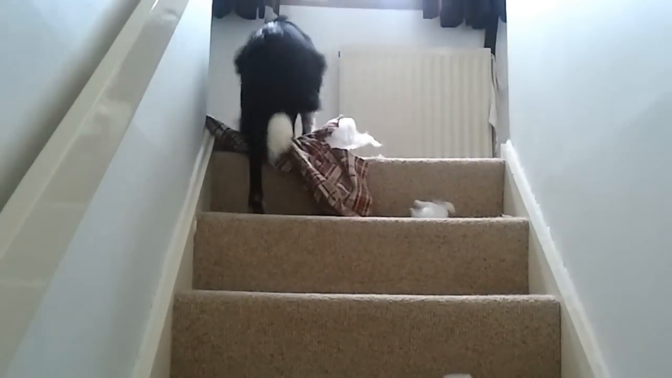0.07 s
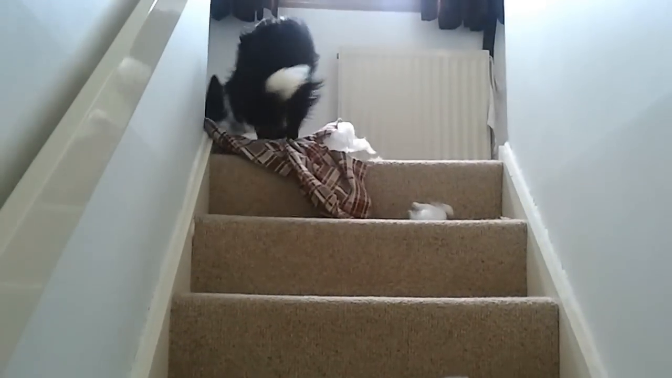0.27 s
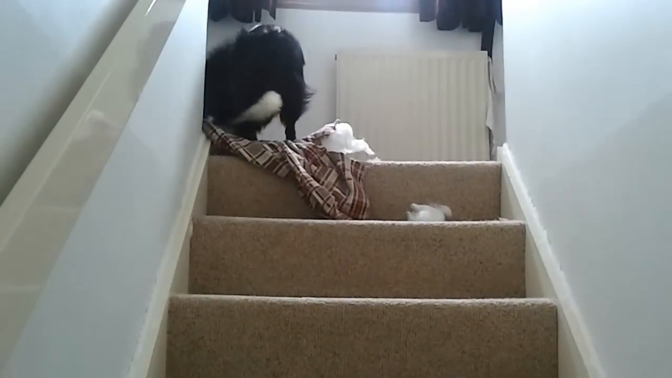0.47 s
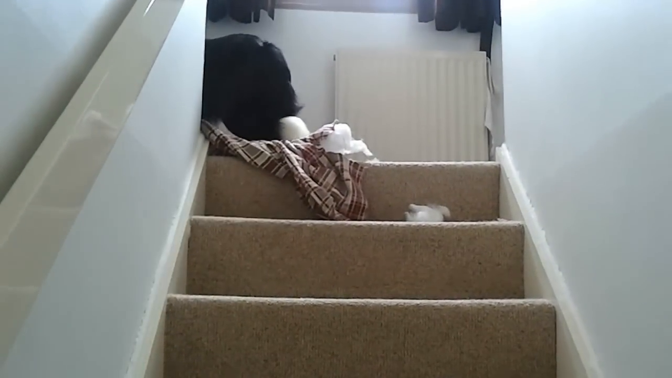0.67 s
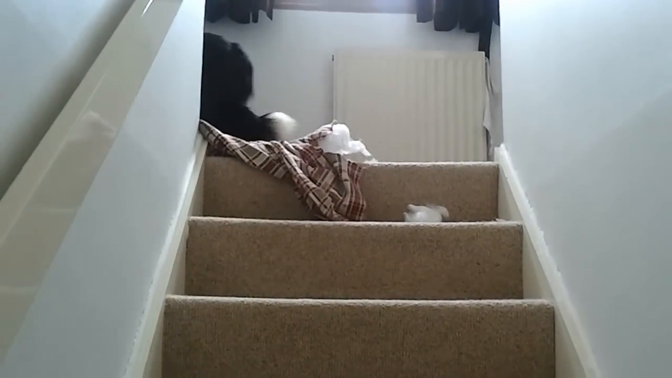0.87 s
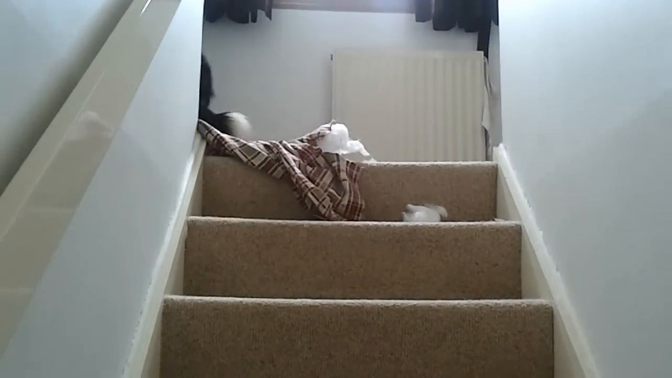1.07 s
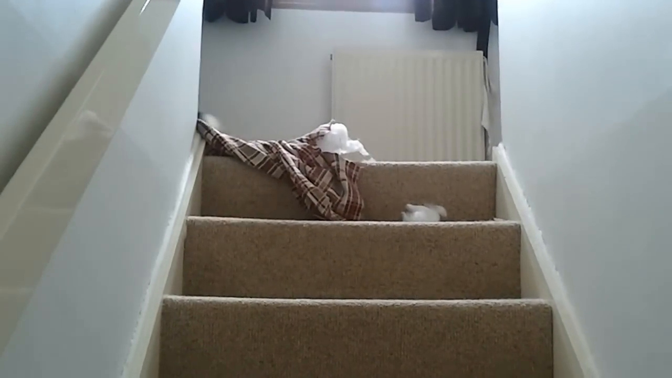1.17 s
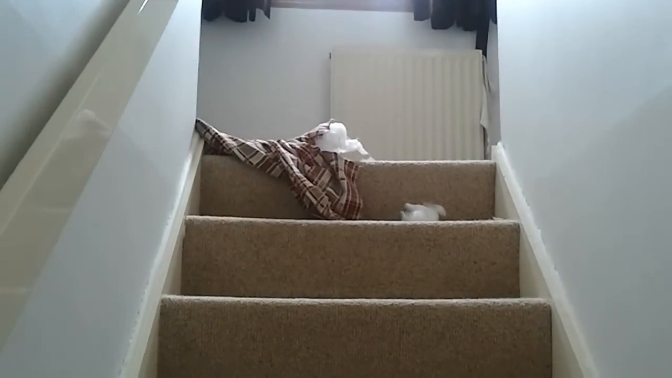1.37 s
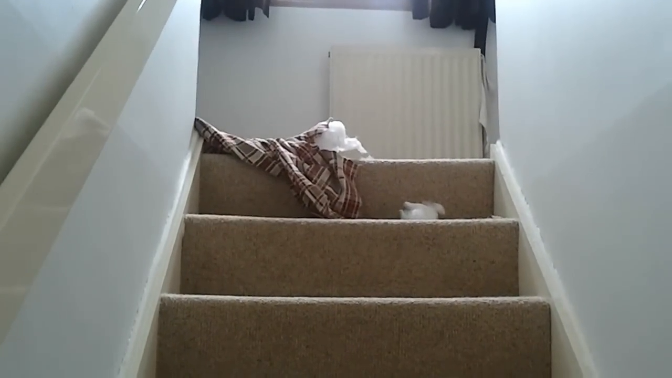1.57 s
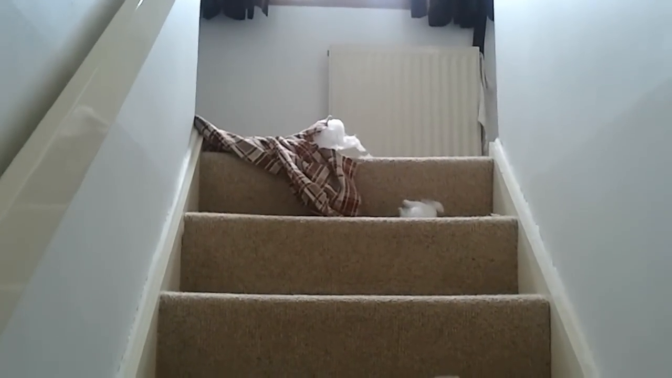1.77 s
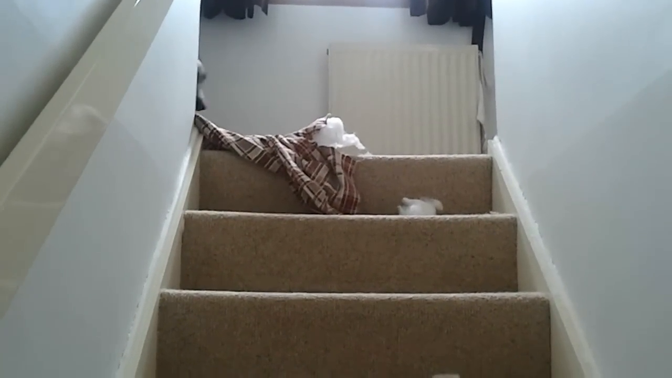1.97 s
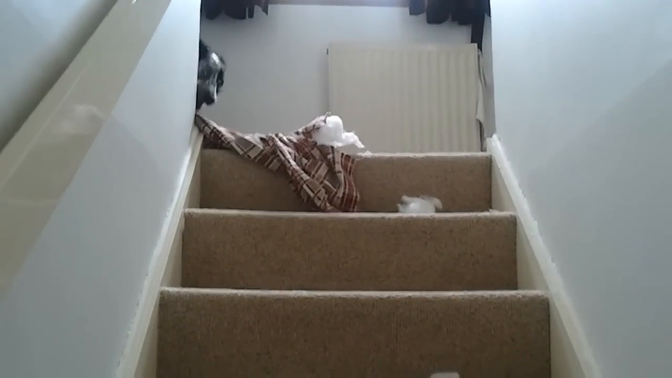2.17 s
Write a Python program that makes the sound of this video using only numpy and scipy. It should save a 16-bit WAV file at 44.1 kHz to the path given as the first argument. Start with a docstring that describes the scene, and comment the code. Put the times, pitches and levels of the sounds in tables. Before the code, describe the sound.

A dog's footsteps on carpeted wooden stairs: a lighter knock at 0.07 s, the loudest at 0.22 with a bright claw scrape, another at 0.32 with a quick after-tap. Soft paw pats run from 0.6 to 1.0 s, with a faint rustle and low board boom near 0.74. Dull, reverberant thumps round the corner fall at 1.12, 1.64 and 2.17, weakening, with faint pats near 1.78 and 2.02, over quiet room hiss.

```python
"""In a quiet house, a dog climbs the top of a carpeted wooden staircase.
Room hiss is shaped noise with a faint narrow whirr; rustles and claw scrapes are swells of filtered noise.
Close knocks sum decaying noise bands, the tread's modes, a two-pitched clack and a slow push.
Soft paw pats (noise bands, a clack, one floorboard boom) follow, and evenly spaced dull thumps
from round the corner, which excite the landing's modes and share one reverberant path."""
import sys
import numpy as np
from scipy import signal
from scipy.fft import rfft, irfft
from scipy.io import wavfile

SR = 44100
rng = np.random.default_rng(int(sys.argv[2]) if len(sys.argv) > 2 else 0)


def generate_wav(sig):
    """Save sig (samples, or channels by samples) to the path in sys.argv[1] as 16-bit PCM at SR."""
    pcm = np.round(np.clip(np.atleast_2d(sig).T, -1, 1) * 32767).astype(np.int16)
    wavfile.write(sys.argv[1], SR, pcm)


N = 97020  # samples, 2.2 s
EDGE_HZ = 7900  # upper band limit of the sound
BAND_CENTRES_HZ = np.geomspace(28, 9000, 26)
BASS_HZ, TREBLE_HZ = 266, 1760  # corners of a blow's weight and hardness
LOW_CUT_HZ = 76  # below this the knocks and pats fall away
CLACK_RISE_S = 0.0026


def amp(db):
    """Level law: a gain is ten to the power of dB / 20."""
    return 10 ** (np.asarray(db) / 20)


def unit(x):
    """Power normalization: scales a signal to an rms of one."""
    return x / np.sqrt(np.mean(x ** 2) + 1e-20)


def read(points, hz):
    """Logarithmic frequency scale: interpolates a table between its points."""
    f, value = np.transpose(points)
    return np.interp(np.log(hz + 1), np.log(f + 1), value)


def add(mix, s, sound):
    """Superposition: adds a sound to the mix from a time in seconds."""
    part = mix[max(round(s * SR), 0):][:len(sound)]
    part += sound[:len(part)]


def noise(n, colour):
    """Spectral shaping: white noise weighted by colour(hz), at an rms of one."""
    hz = np.fft.rfftfreq(n, 1 / SR) + 1
    spectrum = rfft(rng.standard_normal(n)) * colour(hz)
    return unit(irfft(spectrum, n))


def octave_noise(n, centre_hz, width_octaves):
    """Band-pass filtering: noise with a Gaussian spectrum on the octave scale."""
    return noise(n, lambda f: np.exp(-(np.log2(f / centre_hz) / width_octaves) ** 2))


def tilt(hz, bass_db, treble_db):
    """Impact spectrum: a heavy blow has more bass, a hard one more treble (dB)."""
    bass = bass_db / (1 + (hz / BASS_HZ) ** 4)
    treble = treble_db / (1 + (TREBLE_HZ / hz) ** 2)
    return bass + treble


def response(t60, rise_s, direct_db, direct_s, hold_s=0):
    """Reverberant decay: each band has a direct burst, an exponential tail and an energy of one."""
    t = np.arange(SR // 2) / SR
    step = np.log(BAND_CENTRES_HZ[1] / BAND_CENTRES_HZ[0])
    direct = amp(direct_db) * np.exp(-(t / direct_s) ** 2)
    rows = []
    for hz, decay_s in zip(BAND_CENTRES_HZ, t60 * np.ones(len(BAND_CENTRES_HZ))):
        band = noise(len(t), lambda f: np.sqrt(np.maximum(1 - abs(np.log(f / hz)) / step, 0)))
        # even out the noise's own swells
        band = band / np.sqrt(abs(signal.hilbert(band)) + .1)
        # low bands build up more slowly
        rise = 1 - np.exp(-(t / (rise_s + .5 / hz / np.pi)) ** 2)
        # a hold delays the onset of the decay
        tail = np.exp(-np.log(1000) * (np.hypot(t, hold_s) - hold_s) / decay_s)
        row = band * rise * (tail + direct)
        rows.append(row / np.linalg.norm(row))
    return np.array(rows)


def ring(modes, rise_s, bass_db, treble_db, phases=0):
    """Modal synthesis: damped cosines, coloured by the blow; phases are in cycles."""
    t = np.arange(SR // 2) / SR
    tones = np.zeros(len(t))
    for (hz, db, t60), phase in zip(modes, phases + np.zeros(len(modes))):
        gain = amp(db + tilt(hz, bass_db, treble_db))
        decay = np.exp(-np.log(1000) * t / t60)
        tones += gain * decay * np.cos(2 * np.pi * (hz * t + phase))
    return tones * (1 - np.exp(-t / rise_s))


def low_cut(x):
    """High-pass filtering: a fourth-order roll-off of the deep bass."""
    return signal.sosfilt(signal.butter(4, LOW_CUT_HZ, "high", fs=SR, output="sos"), x)


# Spectrum of the room hiss. Each row: frequency in Hz, relative density in dB.
HISS_SPECTRUM = [(15, -34), (25, -17.5), (189, -2), (218, -6), (306, -0.5), (337, -6), (371, 0.5),
                 (450, -5.5), (586, -1.5), (646, -6), (802, -4), (1100, -8), (1950, -11), (5120, -12.5),
                 (7900, -19), (10300, -71), (17400, -120)]
HISS_DB = -55
# a faint narrow band in the hiss, like water in heating pipes
WHIRR_HZ, WHIRR_WIDTH_HZ, WHIRR_DB = 1868, 270, -67.5


def room():
    """Stationary noise: the steady hiss of the quiet house, with a faint whirr in it."""
    hiss = noise(N, lambda f: amp(read(HISS_SPECTRUM, f)) * (f < EDGE_HZ + 300))
    whirr = noise(N, lambda f: np.exp(-((f - WHIRR_HZ) / WHIRR_WIDTH_HZ) ** 2))
    return amp(HISS_DB) * hiss + amp(WHIRR_DB) * whirr


# Rustles of fur and cloth. Each row: middle in seconds, half length in seconds,
# level in dB, centre frequency in Hz.
RUSTLE_SWELLS = [(.01, 0.015, -58.5, 4000), (0.674, 0.11, -59, 3800), (1.737, 0.1, -70, 3200),
                 (1.956, 0.14, -66, 2300), (2.03, 0.04, -54.5, 5800)]


def rustles(width_octaves=1.12, grain_db=1.5):
    """Friction noise: fur and cloth brush past in grainy swells."""
    t = np.arange(N) / SR
    out = np.zeros(N)
    for s, half_s, db, hz in RUSTLE_SWELLS:
        # slow random changes of level
        grain = amp(grain_db * noise(N, lambda f: 1 / (1 + (f / 90) ** 2)))
        swell = np.exp(-((t - s) / half_s) ** 2)
        out += amp(db) * swell * grain * octave_noise(N, hz, width_octaves)
    return out


# Claws scraping just as a paw lands. Each row: start in seconds, level in dB,
# centre frequency in Hz, time to the peak in seconds.
CLAW_SCRAPES = [(0.0647, -50, 4650, 0.002), (.068, -42.5, 2240, 0.0045), (.2212, -30, 4780, 0.0039),
                (.3145, -43.5, 6680, 0.011)]


def scratches(width_octaves=0.64):
    """Friction noise: claws catch the carpet in a short bright scrape."""
    t = np.arange(SR // 10) / SR
    out = np.zeros(N)
    for s, db, hz, peak_s in CLAW_SCRAPES:
        envelope = t / peak_s * np.exp(1 - t / peak_s)
        add(out, s, amp(db) * envelope * octave_noise(len(t), hz, width_octaves))
    return out


KNOCK_DB, TREAD_DB, CLACK_DB, PUSH_DB = 0.5, -23, -15, -29.5  # before each knock's own levels
TREAD_RISE_S = 0.002
CLACK_T60_S = 0.042  # the struck spot rings briefly at two pitches of its own
PUSH_S = 0.0055  # time scale of the push
# Close knocks on the stairs. Each row: start in seconds, level in dB, weight in the bass in dB,
# hardness in the treble in dB, ring of the tread in dB, push on the floor in dB,
# pitch of the low clack in Hz, its level in dB, pitch of the high clack in Hz, its level in dB.
PAW_KNOCKS = [(0.0677, -12, -17, -4, -13.5, -25, 443, -6, 981, 4),
              (0.2241, -2, 2.5, 2, 1, -4, 463, -0.5, 960, -2.5),
              (0.3184, -7.5, -3, -2.5, -7, -15, 587, 3.5, 879, 5.5),
              (0.3392, -20, 0.5, -11.5, 2.5, -18.5, 624, 2.5, 790, 11)]
# Spectrum of a knock. Each row: frequency in Hz, relative level per band in dB.
KNOCK_SPECTRUM = [(30, -46.5), (70, -31), (130, -6), (250, -12), (420, -3.5), (600, -2), (740, -8.5),
                  (950, 2.5), (1180, -7.5), (1850, -3), (2600, -10), (4000, -8), (6000, -13), (8000, -21)]
# Decay of a knock. Each row: frequency in Hz, time to fall by 60 dB in seconds.
KNOCK_DECAY = [(50, 0.26), (150, 0.48), (500, 0.3), (1000, 0.34), (2500, 0.27), (7000, 0.31)]
# Modes of the wooden tread. Each row: frequency in Hz, relative level in dB,
# time to fall by 60 dB in seconds.
TREAD_MODES = [(123, -2.5, .17), (141, 3.5, .2), (184, 2, .21), (318, -5, .15), (366, 3, .13),
               (400, -1, .12), (443, 0, .14), (487, 3, .14), (549, -4, .13), (632, -2, .13), (967, -9, .14),
               (1380, -15, .14), (1890, -14, .14), (3605, -18, .12)]


def knocks():
    """Impact excitation: a landing paw clacks, pushes the stair down once and rings the tread's modes."""
    out, push = np.zeros(N), np.zeros(N)
    x = np.arange(SR // 10) / SR / PUSH_S
    push_pulse = (1 - x / 2) * x * np.exp(1 - x)
    for s, db, bass_db, treble_db, ring_db, push_db, low_hz, low_db, high_hz, high_db in PAW_KNOCKS:
        band_db = read(KNOCK_SPECTRUM, BAND_CENTRES_HZ) + tilt(BAND_CENTRES_HZ, bass_db, treble_db)
        bands = response(read(KNOCK_DECAY, BAND_CENTRES_HZ), rise_s=0.0018, direct_db=3.5, direct_s=0.0087)
        body = amp(KNOCK_DB) * (amp(band_db) @ bands)
        # ring_db lifts the tread above the bass; in the deep bass the weight alone counts
        tread = amp(TREAD_DB + ring_db) * ring(TREAD_MODES, TREAD_RISE_S, bass_db - ring_db, treble_db)
        clack_modes = [(low_hz, low_db, CLACK_T60_S), (high_hz, high_db, CLACK_T60_S)]
        clack = amp(CLACK_DB) * ring(clack_modes, CLACK_RISE_S, 0, 0)
        add(out, s, amp(db) * (body + tread + clack))
        add(push, s, amp(db + PUSH_DB + push_db) * push_pulse)
    # the push keeps its deep bass
    return low_cut(out) + push


PAT_DB, PAT_T60_S = -25.5, 0.68  # level before each pat's own
# the boards answer through the carpet
PAT_CLACK_HZ, PAT_CLACK_DB, PAT_CLACK_T60_S = 609, -41, 0.033
# a floorboard gives under the dog's weight
BOARD_S, BOARD_HZ, BOARD_DB, BOARD_RISE_S, BOARD_T60_S = .738, 90, -40.5, 0.016, 0.17
# Soft paw pats on carpet. Each row: start in seconds, level in dB, weight in the bass in dB,
# clack of the boards in dB.
PAW_PATS = [(0.611, -7, 8.5, -10), (.741, -0.5, -10, 4), (.777, -2, -11, -18), (.941, -3, 3, -5),
            (.954, -0.5, 1, -11), (1.018, -1, -6, 5), (1.778, -7.5, -4, 3), (2.021, -10, 9.5, -12)]
# Spectrum of a pat. Each row: frequency in Hz, relative level per band in dB.
PAT_SPECTRUM = [(50, -11), (100, -7.5), (200, -8.5), (400, -3.5), (620, -1.5), (1000, -10.5), (2000, -17),
                (7000, -16)]


def pats():
    """Cushioned impact: soft pads on carpet, a clack of the boards, and one low boom of the floor."""
    out = np.zeros(N)
    clack = ring([(PAT_CLACK_HZ, PAT_CLACK_DB, PAT_CLACK_T60_S)], CLACK_RISE_S, 0, 0)
    for s, db, bass_db, clack_db in PAW_PATS:
        band_db = PAT_DB + db + read(PAT_SPECTRUM, BAND_CENTRES_HZ) + tilt(BAND_CENTRES_HZ, bass_db, 0)
        add(out, s, amp(band_db) @ response(PAT_T60_S, rise_s=0.0015, direct_db=6.5, direct_s=0.009))
        add(out, s, amp(db + clack_db) * clack)
    out = low_cut(out)
    add(out, BOARD_S, ring([(BOARD_HZ, BOARD_DB, BOARD_T60_S)], BOARD_RISE_S, 0, 0))
    return out


THUMP_DB, LANDING_DB = -9, -46  # before each thump's own level
LANDING_RISE_S = 0.0065
THUMP_HOLD_S = 0.051  # reflections between the walls keep a thump up before it dies
# Dull thumps round the corner. Each row: start in seconds, level in dB,
# weight in the bass in dB, hardness in the treble in dB.
FAR_THUMPS = [(1.1216, -0.5, -3.5, 1.5), (1.6415, -4, -0.5, -17.5), (2.169, -11.5, 1, -30)]
# Spectrum of a thump. Each row: frequency in Hz, relative level per band in dB.
THUMP_SPECTRUM = [(40, -45), (90, -20), (160, -11.5), (260, -10), (420, 0.5), (680, 0), (1000, -6),
                  (1500, -15), (2400, -28.5), (5000, -14), (8000, -26)]
# Decay of a thump. Each row: frequency in Hz, time to fall by 60 dB in seconds.
THUMP_DECAY = [(100, 0.41), (300, 0.32), (700, 0.23), (1800, 0.28), (6000, 0.14)]
# Modes of the landing. Each row: frequency in Hz, relative level in dB,
# time to fall by 60 dB in seconds.
LANDING_MODES = [(112.5, -1, 0.54), (161, -11.5, 0.38), (181.2, 5.5, 0.41), (204.4, -4, 0.41),
                 (261, -0.5, 0.41), (314.6, 7, 0.31), (339, -13.5, 0.39), (372.4, 3.5, .3), (429, 9, .3),
                 (469, 7.5, 0.14), (483, -0.5, .26), (664, 15, 0.1), (712, 4.5, 0.28), (728.5, 6, .24)]


def thumps():
    """Linear transmission: blows on one spot out of sight share one path through the stairwell."""
    out = np.zeros(N)
    path = response(read(THUMP_DECAY, BAND_CENTRES_HZ), rise_s=0.00042, direct_db=-6, direct_s=0.012,
                    hold_s=THUMP_HOLD_S)
    phases = rng.random(len(LANDING_MODES))
    for s, db, bass_db, treble_db in FAR_THUMPS:
        band_db = THUMP_DB + read(THUMP_SPECTRUM, BAND_CENTRES_HZ) + tilt(BAND_CENTRES_HZ, bass_db, treble_db)
        body = amp(band_db) @ path
        landing = ring(LANDING_MODES, LANDING_RISE_S, bass_db, treble_db, phases)
        add(out, s, amp(db) * (body + amp(LANDING_DB) * landing))
    return out


def scene():
    """Superposition: the sum of all sources, in mono."""
    return (room() + rustles() + scratches() + knocks() + pats() + thumps())[None]


def record(dry, soft_hz=7400):
    """Low-pass filtering: the microphone rolls off near the top; then the band limit."""
    f = np.fft.rfftfreq(2 * N, 1 / SR)
    soft = irfft(rfft(dry, 2 * N) / np.sqrt(1 + (f / soft_hz) ** 36))[:, :N]
    band_limit = signal.firwin(401, EDGE_HZ, window=("kaiser", 8), fs=SR)
    return signal.oaconvolve(soft, band_limit[None], "same")


dry = scene()
out = record(dry)
generate_wav(out)
```